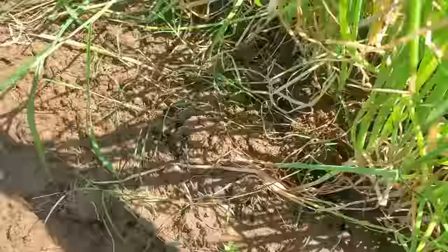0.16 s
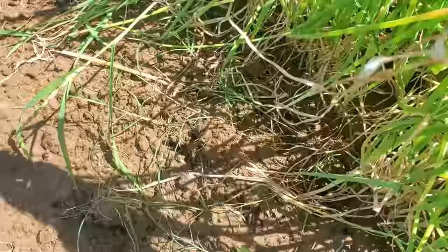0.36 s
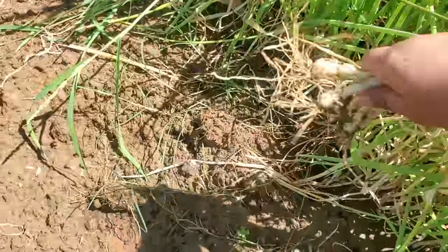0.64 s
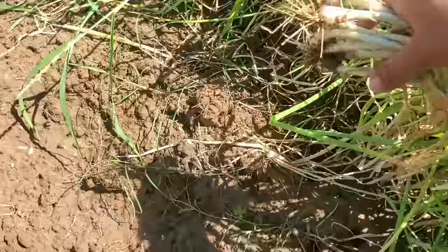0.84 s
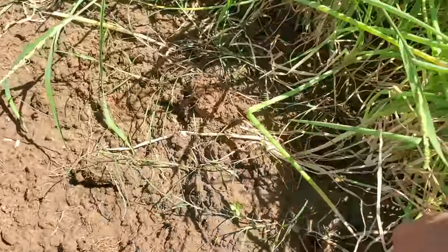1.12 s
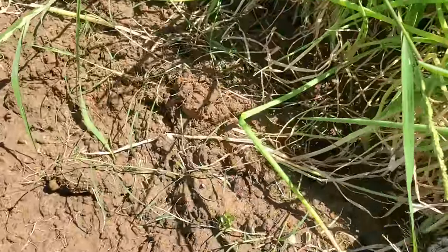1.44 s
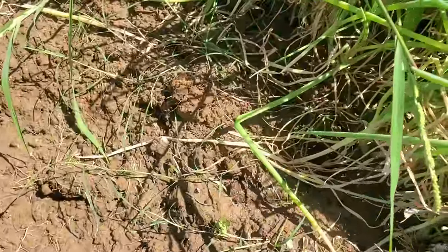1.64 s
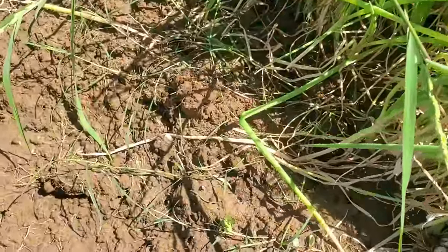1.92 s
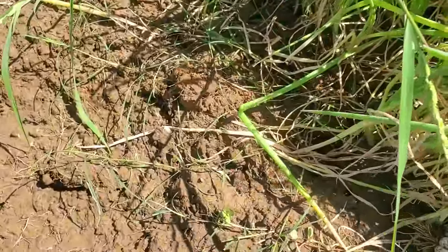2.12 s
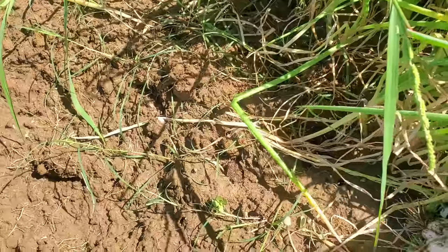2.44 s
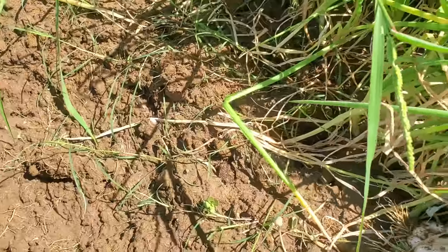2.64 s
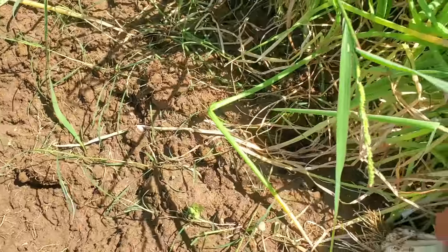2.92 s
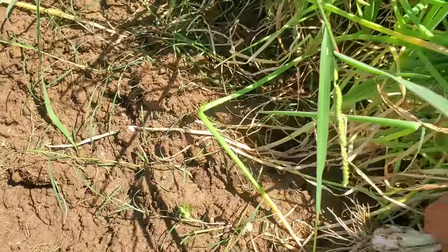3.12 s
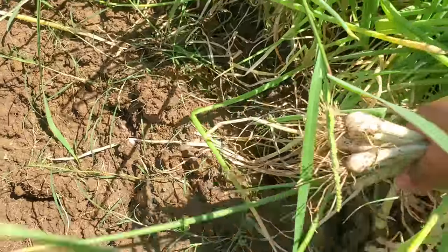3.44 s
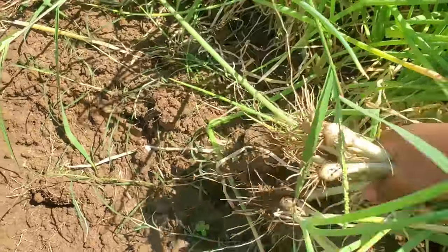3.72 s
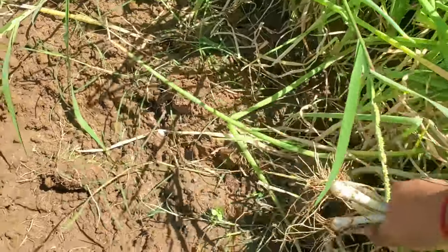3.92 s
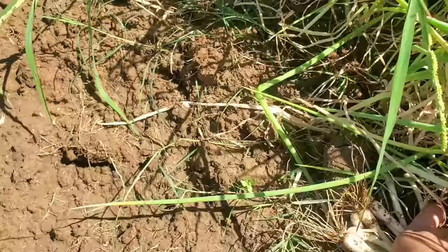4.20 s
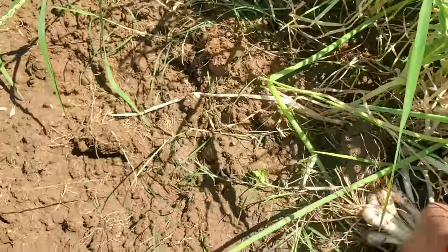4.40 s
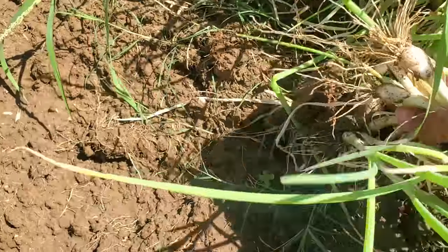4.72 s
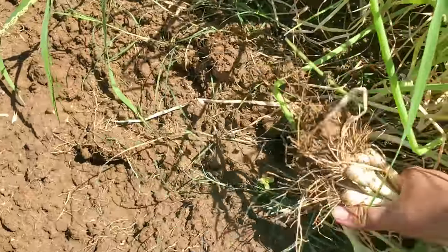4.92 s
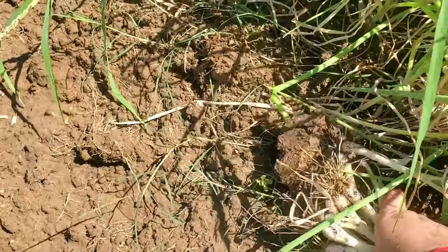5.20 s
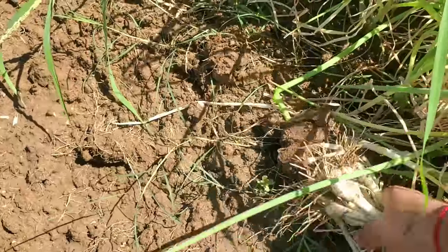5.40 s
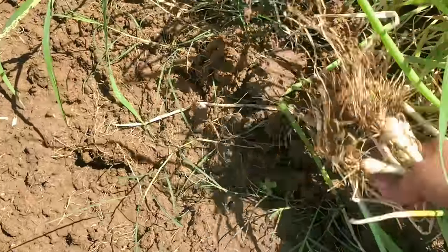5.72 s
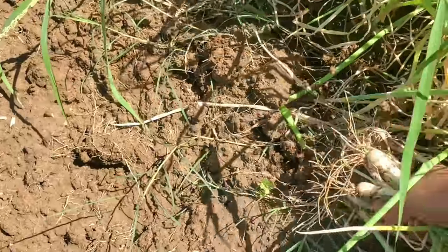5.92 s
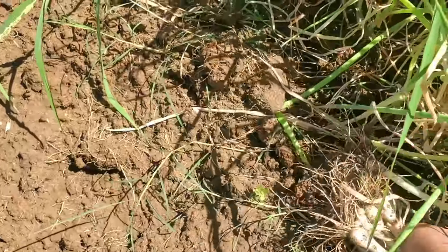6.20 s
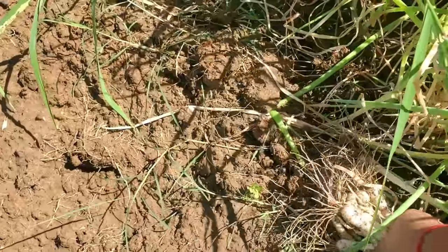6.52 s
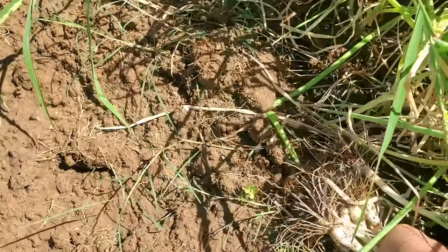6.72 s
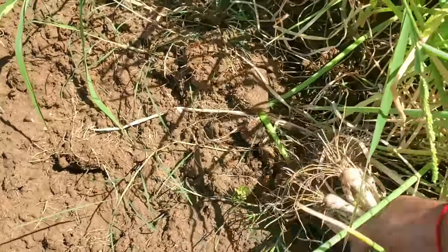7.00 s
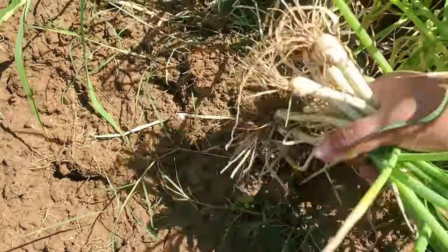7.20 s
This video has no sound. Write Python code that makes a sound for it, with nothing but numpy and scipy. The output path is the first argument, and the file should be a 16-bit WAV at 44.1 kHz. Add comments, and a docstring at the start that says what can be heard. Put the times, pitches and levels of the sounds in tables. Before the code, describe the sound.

Plants are tugged by hand from dry soil with crisp leaf rustles and sharp stalk snaps, while an engine drones steadily beyond a lightly windy field.

```python
"""A dry field: a hand pulls plants out of the soil; grass rustles, a stalk squeaks, stalks and roots snap.
A pump engine drones some way off as sines and a looped clatter, over a distant wash of noise.
A bird chirps once in gliding tones; light wind buffets the microphone in puffs of low noise;
the camera is jolted twice with low thuds. Rustle is clumped hiss and crackle; snaps are shaped noise bursts."""
import sys
import numpy as np
from scipy import signal
from scipy.fft import rfft, irfft, next_fast_len
from scipy.io import wavfile
from scipy.ndimage import uniform_filter1d

SR = 44100
rng = np.random.default_rng(int(sys.argv[2]) if len(sys.argv) > 2 else 0)


def file_out(sig):
    """Save sig as 16-bit WAV at sys.argv[1]."""
    # one column per channel
    cols = np.atleast_2d(sig).T
    # limit, then scale
    lim = np.clip(cols, -1, 1)
    pcm = np.round(lim * 32767).astype(np.int16)
    wavfile.write(sys.argv[1], SR, pcm)


N = 324311
HOP = 512  # samples a control frame


def amp(db):
    """Decibels to gain."""
    return 10 ** (np.asarray(db) / 20)


def evened(x):
    """Scales to rms 1."""
    return x / np.sqrt(np.mean(x ** 2) + 1e-20)


def read(points, hz):
    """Reads a spectrum table on a log frequency axis."""
    f, value = np.transpose(points)
    return np.interp(np.log(hz + 1), np.log(f + 1), value)


def curves(rows):
    """Every column of a time table, one value a sample."""
    s, *columns = np.transpose(rows)
    return [np.interp(np.arange(N) / SR, s, c) for c in columns]


def colour(x, points):
    """Filters by a spectrum table in dB."""
    size = next_fast_len(N)
    gain = amp(read(points, np.fft.rfftfreq(size, 1 / SR)))
    return irfft(rfft(x, size) * gain, size)[..., :N]


def frame_times():
    """Control frame times in seconds."""
    return np.arange(N // HOP + 2) * HOP / SR


def wander(count, top_hz):
    """Frame-rate rows of slow random drift, rms 1."""
    hz = np.geomspace(.1, top_hz, 16)[:, None]
    phase_turns = rng.random((count, 16, 1))
    waves = np.sin(2 * np.pi * (hz * frame_times() + phase_turns))
    return evened((waves / hz ** 0.22).sum(1))


def spread(rows):
    """Frame-rate rows to sample rate."""
    return np.array([np.interp(np.arange(N) / HOP, np.arange(len(r)), r) for r in rows])


def power_sum(rest_db, levels_db):
    """Frame-rate levels added as powers over a resting level, then read at every sample."""
    power = amp(2 * rest_db) + amp(2 * levels_db).sum(0)
    return spread([10 * np.log10(power)])[0]


def add(mix, s, sound):
    """Adds a sound at time s."""
    part = mix[:, round(s * SR):][:, :sound.shape[1]]
    part += sound[:, :part.shape[1]]


# left-right likeness of broad noise: (frequency [Hz], correlation [-1..1])
LIKENESS = [(60, 1), (180, 0.87), (550, 0.58), (1650, -0.15), (15000, -.3)]


def pair(points):
    """Two-channel noise, alike in the bass and slightly opposed in the treble, rms 1."""
    size = next_fast_len(N)
    hz = np.fft.rfftfreq(size, 1 / SR)
    a, b = rfft(rng.standard_normal((2, size)))
    same = np.clip(read(LIKENESS, hz), -1, 1)
    both = np.array([a, same * a + np.sqrt(1 - same ** 2) * b])
    return evened(irfft(both * amp(read(points, hz)), size)[:, :N])


# distant wash: (frequency [Hz], relative level [dB per Hz])
FIELD_SPECTRUM = [(70, -14.5), (130, -4), (260, -13.5), (400, -16.5), (600, -20.5), (930, -24.5),
                  (1400, -22), (2500, -25), (5000, -33), (16000, -70)]
FIELD_DB = -44.5


def field():
    """Distant wash: steady noise falling towards the treble."""
    return amp(FIELD_DB) * pair(FIELD_SPECTRUM)


# engine course: (time [s], shaft rate [Hz], 6th order level, used less its mean [dB],
#                 clatter level [dB], swell of 18th and 19th orders [dB])
ENGINE_COURSE = [(0, 26.74, -39.5, -52, 3), (.6, 26.74, -38, -47.5, 4), (1.5, 26.83, -37.5, -48.5, -4),
                 (2.5, 26.74, -38.5, -51, -2), (3.5, 26.75, -41, -50, 3), (4.4, 26.75, -44, -49.5, -1),
                 (5.3, 26.74, -43, -51.5, -3), (6.2, 26.75, -38, -50, 0.1), (7.35, 26.79, -38.5, -50, 0.1)]
# steady orders: (multiple of shaft rate [-], relative level [dB])
ORDERS = [(1, -24.5), (2, 1), (3, -15), (4, -12.5), (5, -9), (6, -7.5), (7, -20), (8, -13.5), (9, -16.5),
          (10, -25.5), (11, -23), (12, -19.5), (13, -23), (14, -23), (15, -22.5), (16, -28.5), (18, -28),
          (19, -27), (22, -32), (40, -27), (62, -31), (75, -27.5)]
# clatter envelope: (frequency [Hz], relative line level [dB])
CLATTER_SPECTRUM = [(600, -10), (1100, -1), (1700, 1.2), (2600, -3.5), (3400, -23)]
DRONE_GAIN_DB = -33.5
SING_S, SING_20DB_DOWN_S = 1.35, .95  # highest three orders stand out: middle, distance to 20 dB down
LEAD_TURNS, LOOSE_TURNS = .3, .55  # orders peak loosely together, ahead of the 2nd; the lower the looser
CYCLE = 2048  # points a shaft turn


def drone(turns, sixth_db, upper_db):
    """Shaft orders: low sines with slowly drifting levels."""
    k, db = np.transpose(ORDERS)
    db = db[:, None] + spread(1.1 * wander(len(k), 4))
    db[5] += sixth_db - sixth_db.mean()
    db[np.isin(k, (18, 19))] += upper_db
    db[-3:] -= 20 * ((np.arange(N) / SR - SING_S) / SING_20DB_DOWN_S) ** 4
    side_rad = 0.3 * rng.standard_normal(len(k)) * np.minimum(k / 14, 1)  # left-right phase
    ahead = (LEAD_TURNS + LOOSE_TURNS * rng.standard_normal(len(k)) / np.sqrt(k)) * (k != 2)
    angle = 2 * np.pi * (k[:, None] * turns + ahead[:, None])
    waves = [(amp(db) * np.cos(angle + side * side_rad[:, None])).sum(0) for side in (-.5, .5)]
    return np.sqrt(2) * np.array(waves)


def clatter(turns, shaft_hz):
    """Periodic clatter, rms 1: four cycle shapes a channel cross-fade, so lines drift as air paths change."""
    order = np.arange(CYCLE // 2 + 1)
    lines = rng.standard_normal((2, 4, len(order), 2)) @ [1, 1j]
    uneven_db = 2.5 * rng.standard_normal(len(order))
    lines *= amp(uneven_db + read(CLATTER_SPECTRUM, order * shaft_hz.mean()))
    shapes = irfft(lines, CYCLE)
    place = (turns % 1) * CYCLE
    fades = spread(wander(4, 1.488))
    fades /= np.sqrt((fades ** 2).sum(0))
    channels = [sum(f * np.interp(place, np.arange(CYCLE), s, period=CYCLE) for f, s in zip(fades, c))
                for c in shapes]
    return evened(np.array(channels))


def engine():
    """Pump engine: drone and clatter locked to one shaft angle."""
    shaft_hz, sixth_db, clatter_db, upper_db = curves(ENGINE_COURSE)
    turns = np.cumsum(shaft_hz) / SR
    low = amp(DRONE_GAIN_DB) * drone(turns, sixth_db, upper_db)
    return low + amp(clatter_db) * clatter(turns, shaft_hz)


def whistle(notes):
    """Short gliding tones whose pitch and level waver together."""
    out = np.zeros((2, N))
    for rows in notes:
        s, hz, db = np.transpose(rows)
        t = np.arange(s[0], s[-1], 1 / SR)
        waver = 1 + 0.016 * evened(uniform_filter1d(rng.standard_normal(len(t)), 150))
        turns = np.cumsum(np.interp(t, s, hz) * waver) / SR
        tone = np.sin(2 * np.pi * (turns + 0.33 * rng.random((2, 1))))
        level = np.sqrt(2) * amp(np.interp(t, s, db) + 250 * (waver - 1))
        add(out, s[0], level * tone * signal.windows.tukey(len(t), .2))
    return out


# one table a note: (time [s], pitch [Hz], level [dB])
BIRD_NOTES = [
    [(1.105, 5350, -61), (1.145, 5750, -57), (1.17, 5500, -66)],
    [(1.178, 4110, -62), (1.24, 3800, -65)],
]


def bird():
    """Far-off bird: two short, faint whistled notes."""
    return whistle(BIRD_NOTES)


# buffeting: (frequency [Hz], relative level [dB])
BUFFET_SPECTRUM = [(20, -26), (45, 3), (62, 11), (75, 14.5), (95, 1.5), (140, -9), (300, -47.5)]
# puffs: (middle [s], level [dB], middle to 20 dB down [s])
WIND_PUFFS = [(0.345, -29.5, 0.14), (.75, -35, 0.23), (1.37, -34, .07), (1.767, -32.5, 0.068),
              (2.26, -33, .06), (3.12, -34.5, 0.12), (3.74, -30.5, 0.12), (4.22, -31.5, .07),
              (4.445, -35.5, 0.14), (5.119, -34, 0.052), (6.098, -33.5, 0.15), (6.496, -30.5, .18),
              (7.076, -33.5, 0.092), (7.295, -32.5, 0.14)]
BREEZE_DB = -45.5  # between puffs


def wind():
    """Lumpy low buffeting in bell-shaped puffs, much alike at both ports."""
    middle, db, length = np.transpose(WIND_PUFFS)[..., None]
    puffs_db = db - 20 * ((frame_times() - middle) / length) ** 2
    return amp(power_sum(BREEZE_DB, puffs_db)) * pair(BUFFET_SPECTRUM)


# jolts: (time [s], level [dB], t60 [s])
CAMERA_JOLTS = [(3.131, -11.5, 0.12), (4.622, -16, 0.38)]


def jolts():
    """Low thuds through the camera body: two decaying sines a port, unlike at the two ports."""
    out, t = np.zeros((2, N)), np.arange(SR // 4) / SR
    low_hz, high_hz = np.array([[55.], [70.]]), np.array([[170.], [130.]])
    thud = np.sin(2 * np.pi * low_hz * t) + 0.39 * np.sin(2 * np.pi * high_hz * t)
    for s, db, t60 in CAMERA_JOLTS:
        level = amp(db - 60 * t / t60) * np.minimum(t / 0.017, 1)
        add(out, s, level * thud * [[-.3], [1]])
    return out


# one table a ring of the squeak: (time [s], pitch [Hz], level [dB])
SQUEAK_RINGS = [
    [(7.228, 2424, -48), (7.246, 2540, -51)],
    [(7.231, 1340, -47), (7.254, 1420, -45), (7.266, 1620, -56)],
]


def squeak():
    """A stalk rubbing in the hand: short gliding rings."""
    return whistle(SQUEAK_RINGS)


# hand moves: (start [s], hold [s], leaves level [dB], soil and roots level [dB])
HAND_MOVES = [(0.0, 0.14, -45, -44), (.24, 0.084, -46.5, -49), (.46, 0.15, -48, -48.5),
              (1.34, 0.15, -51.5, -58), (2.03, 0.046, -54, -55.5), (2.4, .13, -45, -48.5),
              (2.806, 0.24, -55.5, -55.5), (3.148, 0.1, -48, -43), (3.295, 0.044, -45.5, -53),
              (3.444, 0.12, -44, -49), (3.846, 0.088, -51, -52), (4.357, 0.083, -50.5, -56.5),
              (4.59, .21, -49, -52.5), (4.863, .05, -51, -54.5), (5.005, 0.026, -48.5, -50.5),
              (5.5, .075, -47, -51), (5.66, .07, -51, -56), (5.77, .12, -45, -49), (6.0, 0.14, -53, -55),
              (6.968, .02, -49, -54), (7.054, 0.057, -49, -50), (7.2, 0.17, -48, -50)]
# leaves settling between moves: (time [s], level [dB])
SETTLING = [(0, -52), (2.7, -62), (4.2, -58), (6.6, -65), (7.35, -58)]
TRICKLE_DB = -55  # soil between moves
RISE_DB_PER_S, FALL_DB_PER_S = 159, 91


def moves():
    """Levels of leaves and soil: each move rises, holds and dies away."""
    s, hold, leaves_db, soil_db = np.transpose(HAND_MOVES)[..., None]
    t = frame_times()
    shape_db = -RISE_DB_PER_S * np.maximum(s - t, 0) - FALL_DB_PER_S * np.maximum(t - s - hold, 0)
    settling_db = np.interp(t, *np.transpose(SETTLING))
    return power_sum(settling_db, leaves_db + shape_db), power_sum(TRICKLE_DB, soil_db + shape_db)


def grains(drive_db, per_s, t60, share, clump):
    """Hiss in sharp-starting clumps, plus cracks that thicken with drive but sink into the hiss."""
    starts = rng.exponential(1, N) * (rng.random(N) < 60 / SR)
    clumps = signal.lfilter([1], [1, -np.exp(-1 / (0.0097 * SR))], starts)
    hiss = rng.standard_normal((2, N)) * (1 + clump * clumps)
    excess_db = drive_db - drive_db.mean()
    rate = per_s * amp(.3 * excess_db)
    size = amp(3.3 * np.minimum(rng.exponential(1, N), 2.6)) * (rng.random(N) < rate / SR)
    t, hz = np.arange(HOP) / SR, np.fft.rfftfreq(HOP, 1 / SR)
    which, crackle = rng.integers(0, 16, N), np.zeros((2, N))
    for k, centre_hz in enumerate(np.geomspace(700, 15000, 16)):
        ring = 0.12 + 1 / (1 + ((hz - centre_hz) / (0.21 * centre_hz)) ** 2)
        burst = irfft(rfft(rng.standard_normal((2, HOP))) * ring) * amp(-60 * t / t60)
        crackle += signal.oaconvolve((size * (which == k))[None], burst, axes=1)[:, :N]
    return evened(hiss) + share * amp(-.2 * excess_db) * evened(crackle)


# leaves: (frequency [Hz], relative level [dB per Hz])
LEAF_SPECTRUM = [(1500, -20), (3000, -4), (4500, -4.5), (6300, -5), (7250, -10), (8300, -3), (9500, 0),
                 (12000, -8), (16000, -14)]
# soil and roots: (frequency [Hz], relative level [dB])
SOIL_SPECTRUM = [(250, -46), (500, 2), (900, 0), (2200, -1.5), (4000, -6), (6500, -19.5)]


def rustle():
    """Leaves hiss and crackle, brighter when brushed harder; the soil crumbles below them."""
    brush_db, crumble_db = moves()
    leaves = evened(colour(grains(brush_db, 250, 0.009, 0.52, 0.5), LEAF_SPECTRUM))
    highpass = signal.butter(2, 12000, "high", fs=SR, output="sos")
    top = signal.sosfiltfilt(highpass, leaves)
    leaves = leaves + (amp(0.65 * (brush_db + 48)) - 1) * top
    soil = evened(colour(grains(crumble_db, 300, 0.007, 0.8, 0.5), SOIL_SPECTRUM))
    return amp(brush_db) * leaves + amp(crumble_db) * soil


# snaps: (time [s], crack peak [dB], centre [Hz], low knock peak relative to crack [dB])
PLANT_SNAPS = [(0.052, -27, 4400, -8), (0.119, -24, 6500, -6), (0.14, -28, 2900, -9),
               (0.2902, -33, 9500, -14), (0.3077, -31, 9200, -20), (0.6504, -32, 8710, -2),
               (1.026, -32.5, 8900, -7), (1.5513, -32, 8970, -24), (1.7125, -32, 3780, -14),
               (1.9011, -31, 12500, -25), (2.2278, -36, 11000, -20), (2.369, -35, 9550, -14),
               (2.468, -33, 4500, 2), (2.4761, -25, 9500, -12), (2.5321, -27.5, 8900, 0),
               (2.8991, -34.5, 10900, -9), (3.0834, -34, 5500, -10), (3.143, -35, 1100, -6),
               (3.1644, -30, 8540, -12), (3.189, -30, 3500, -10), (3.1992, -26, 4150, -18),
               (3.222, -29, 9160, -9), (3.234, -30, 5270, -7), (3.254, -28, 8550, -16),
               (3.3954, -22, 4330, -0.5), (3.465, -32, 1000, -12), (3.469, -25, 11800, -5),
               (3.4881, -20, 9800, -14), (3.4895, -24, 4300, -12), (3.5305, -29, 3660, -11),
               (4.3876, -31, 8540, -15), (4.6362, -24, 10030, -22), (4.7638, -12, 5300, -18),
               (5.0353, -27.5, 3300, -1), (5.0714, -31, 9300, -23), (5.5281, -30, 5800, -9),
               (5.545, -29, 5320, -9), (5.759, -20, 10700, -31), (5.839, -30, 10000, -4),
               (5.852, -31, 2300, -3), (5.857, -32, 5500, -10), (6.324, -36, 10000, -20),
               (6.357, -35, 10000, -20), (7.043, -33, 8400, -10), (7.2255, -23.5, 4700, -12)]
CRACK_T60_S, TAIL_T60_S = 0.005, 0.027  # first crack, splintering tail
TAIL_AT_0DB_PEAK_DB, BROAD_AT_0DB_PEAK_DB = -16.5, -13.0  # both rise 0.4 dB per dB of quieter peak
LIKENESS_SNAP = 0.6  # left-right
CLICK = 3.0  # first break, added to unit noise


def snaps():
    """A burst round its centre over a broad crack, weaker for thick stalks and dull roots, and a low knock."""
    out, size, lead = np.zeros((2, N)), 2 * HOP, 64
    t, hz = (np.arange(size) - lead) / SR, np.fft.rfftfreq(size, 1 / SR)
    low = amp(read(SOIL_SPECTRUM, hz)) / (1 + (hz / 2800) ** 4)
    for s, db, centre_hz, knock_db in PLANT_SNAPS:
        a, b = rng.standard_normal((2, size))
        a[lead] += CLICK
        noise = np.array([a, LIKENESS_SNAP * a + np.sqrt(1 - LIKENESS_SNAP ** 2) * b])
        tail = amp(TAIL_AT_0DB_PEAK_DB - .4 * db - 60 * t / TAIL_T60_S)
        fall = (amp(-60 * t / CRACK_T60_S) + tail) * (t >= 0)
        burst = rfft(noise * fall)
        burst /= np.sqrt(uniform_filter1d(abs(burst) ** 2, size=HOP // 16))  # even over frequency
        broad = amp(BROAD_AT_0DB_PEAK_DB - .4 * db + read(LEAF_SPECTRUM, hz))
        broad *= min(centre_hz / 4000, 1) ** 2
        peak = 1 / (1 + ((hz - centre_hz) / (0.26 * centre_hz)) ** 4)
        crack, knock = irfft(burst * (broad + peak)), irfft(burst * low)
        sound = amp(db) * crack / abs(crack).max() + amp(db + knock_db) * knock / abs(knock).max()
        add(out, s - lead / SR, sound)
    return out


def scene():
    """All sources at the two microphone ports."""
    background = field() + engine() + bird() + wind() + jolts()
    return background + squeak() + rustle() + snaps()


# port colour: (frequency [Hz], left minus right [dB])
PORT_LEAN = [(60, 0.5), (240, -1), (3770, 1.5), (15000, -4)]
EDGE_HZ = 15900


def record(dry):
    """The ports differ in colour; then the band limit."""
    half = np.array(PORT_LEAN) * [1, .5]
    ports = np.array([colour(dry[0], half), colour(dry[1], half * [1, -1])])
    lowpass = signal.firwin(1023, EDGE_HZ, window=("kaiser", 9), fs=SR)
    return signal.oaconvolve(ports, lowpass[None], "same")


dry = scene()
out = record(dry)
file_out(out)
```